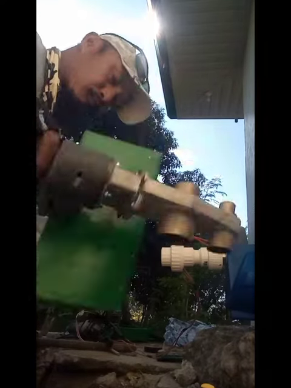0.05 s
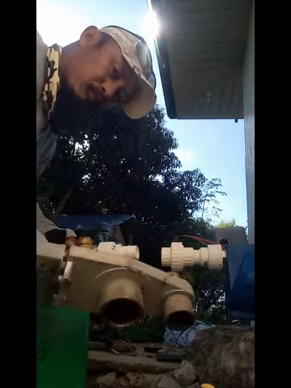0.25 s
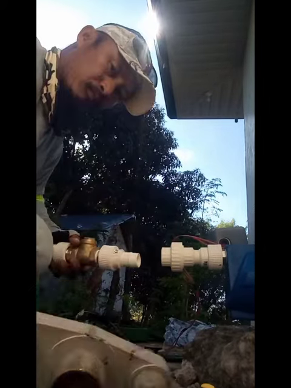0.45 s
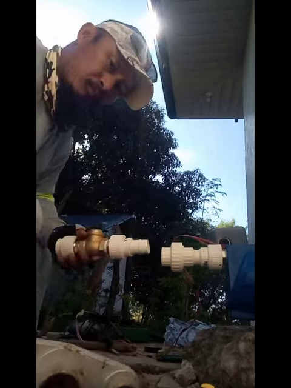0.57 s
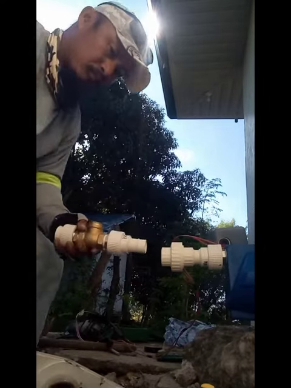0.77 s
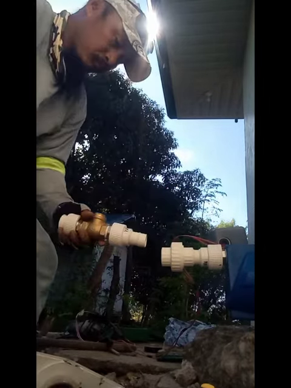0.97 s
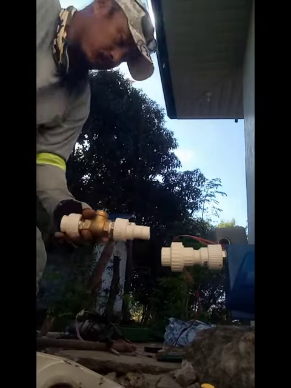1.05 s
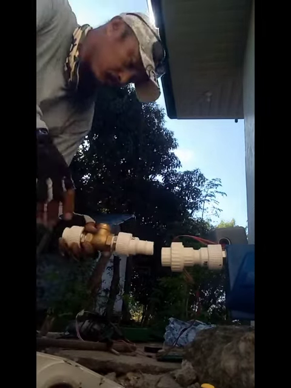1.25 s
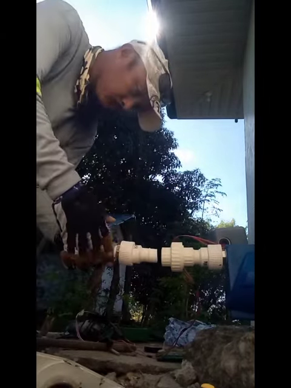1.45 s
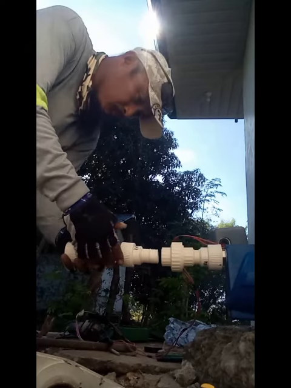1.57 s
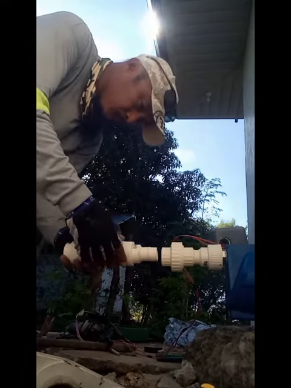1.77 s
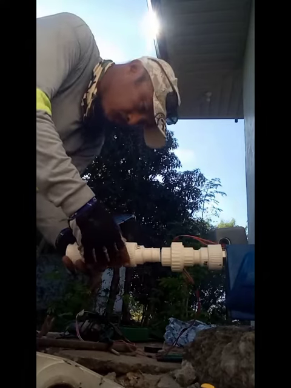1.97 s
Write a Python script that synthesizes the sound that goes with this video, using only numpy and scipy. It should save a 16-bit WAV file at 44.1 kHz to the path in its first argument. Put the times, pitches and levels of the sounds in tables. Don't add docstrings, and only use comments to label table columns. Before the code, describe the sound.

Hard gritty knocks of a hollow pipe fitting set down on stones, then quiet open yard

```python
import sys
import numpy as np
from scipy import signal
from scipy.io import wavfile

SR = 44100
rng = np.random.default_rng(int(sys.argv[2]) if len(sys.argv) > 2 else 0)


def put_to_file(sound):
    columns = np.atleast_2d(sound).T
    safe = np.clip(columns, -1, 1)
    whole_steps = np.round(safe * 32767)
    wavfile.write(sys.argv[1], SR, whole_steps.astype(np.int16))


def volts(x):
    e = np.asarray(x, float) / 20
    return 10 ** e


N = 88200


def clock():
    return np.arange(N) / SR


def rms_one(x):
    return x / np.sqrt(np.mean(x ** 2) + 1e-20)


def butter(x, order, hz, kind):
    return signal.sosfilt(signal.butter(order, hz, kind, fs=SR, output="sos"), x)


def drift(rate_hz):
    pole = np.exp(-80 * np.pi * rate_hz / SR)
    noise = rng.standard_normal(N // 40 + 2002)
    slow = signal.lfilter([1], [1, -2 * pole, pole * pole], noise)[2000:]
    return np.interp(np.arange(N) / 40, np.arange(len(slow)), rms_one(slow))


def ring(clicks, hz, t60_s):
    r = volts(-60 / (t60_s * SR))
    w = 2 * np.pi * hz / SR
    return signal.lfilter([0, np.sin(w)], [1, -2 * r * np.cos(w), r * r], clicks + 1e-18)


def banded(x, spectrum, patchy_db):
    edges = 25 * 2 ** np.arange(0, 9.6, 1 / 3)
    hz, db = np.transpose(spectrum)
    out = 0
    for k, (low, high) in enumerate(zip(edges, edges[1:])):
        band = butter(x[k % 2], 2, [low, high], "band")
        level_db = np.interp(np.log(low * high) / 2, np.log(hz), db, left=db[0] - 17)
        out = out + volts(level_db + patchy_db * drift(14.0)) * band
    return out


FOOTING_STARTS = [0, .4, .5, .55, .68]
# f/Hz, level/dB, t60/s
WALL_MODES = [
    [(1486, -3.5, 0.1), (1983, -4, 0.14), (2362, -3.5, 0.074), (2724, -9, 0.16), (2883, 3, .05),
     (3120, -5, 0.1), (3557, -5, 0.12), (3793, -5, 0.18), (4640, -5.5, .1), (5720, -12, 0.15),
     (6160, -10, 0.11), (6750, -10, 0.049)],
    [(1443, -7.5, 0.037), (1530, 1.5, 0.026), (1900, -12, .11), (2197, -4, 0.049), (2594, -3.5, .13),
     (3400, -19.5, 0.09), (3955, -3, .055), (4660, -8.5, 0.063), (5090, -11.5, .08), (6430, -8, 0.093),
     (7084, -14, .085)],
    [(1930, -6, .15), (2270, -13, 0.14), (3747, 4, 0.093), (4370, -1, 0.09), (5012, -7, 0.15),
     (6277, -6.5, .09), (7068, -4, .11)],
    [(1500, 3, 0.068), (2000, -11, 0.13), (2249, -0.5, .13), (2638, -3, 0.058), (3096, -9, 0.1),
     (3740, -10, 0.072), (4700, -15, 0.072), (6900, -6, .085)],
    [(1500, -4, 0.076), (2400, -9, 0.099), (2656, -2, 0.1), (2780, 4, 0.091), (3370, -3, .1),
     (4619, -16, .1)],
]
WALL_DB, SPREAD_DB_PER_OCT, FIRST_HIT_DB = -39.5, 8, 6.5
TWIN_DETUNE, TWIN_DB = 0.016, -4


def wall(t, runs, contacts, s, db, centre_hz):
    out = np.zeros(SR)
    first = (t >= 0) & (t < 1 / SR)
    footing = np.searchsorted(FOOTING_STARTS, s[:, 0]) - 1
    for k, modes in enumerate(WALL_MODES):
        here = footing == k
        for hz, mode_db, t60_s in modes:
            distance_oct = abs(np.log2(hz / centre_hz))
            reach = volts(db + mode_db + WALL_DB - SPREAD_DB_PER_OCT * distance_oct)[here]
            push = (reach * runs[here]).sum(0) * contacts
            hit = volts(FIRST_HIT_DB) * (reach * first[here]).sum(0)
            twin_hz = hz * (1 + TWIN_DETUNE * rng.uniform(0.32, 1) * rng.choice([-1, 1]))
            out += ring(push * rng.standard_normal(SR) + hit, hz, t60_s)
            out += volts(TWIN_DB) * ring(push * rng.standard_normal(SR), twin_hz, t60_s * 0.7)
    return out


# f/Hz, level/dB, t60/s
BODY_MODES = [(141.3, -5, 0.075), (284, 3, 0.021), (385, -3, 0.058), (450, -17.5, 0.023),
              (574.5, -1.5, 0.032), (686, -4, 0.041), (851, -6, 0.024), (1030, -3.5, 0.0088)]
BODY_DB = -36.5


def body(runs, contacts, thud_db):
    out = np.zeros(SR)
    for hz, mode_db, t60_s in BODY_MODES:
        push = (volts(thud_db + mode_db + BODY_DB) * runs).sum(0) * contacts
        out += ring(push * rng.standard_normal(SR), hz, t60_s)
    return out


def hollow_knocks(runs, contacts, db, centre_hz):
    level_db, decay_cycles = -24.5, 38
    out = np.zeros(SR)
    for run, hz in zip(volts(db) * runs, centre_hz[:, 0]):
        out += volts(level_db) * ring(run * contacts * rng.standard_normal(SR), hz, decay_cycles / hz)
    return out


# f/Hz, density/(dB per Hz)
GRIT_SPECTRUM = [(150, -21), (300, -6), (1400, -5), (2300, -1.5), (4700, -7.5), (7000, -18.5), (9500, -57),
                 (15800, -43)]
GRIT_DB, GRIT_FOLLOWS_THUD, BRIGHT_FROM_HZ = -1, 0.17, 5020


def grit(runs, contacts, db, thud_db, bright):
    crunch = np.zeros((2, N))
    push = volts(db + GRIT_FOLLOWS_THUD * (thud_db - db)) * runs
    sand = contacts * rng.standard_normal((2, SR))
    for kind, share in ("low", 1), ("high", bright):
        crunch[:, :SR] += butter((push * share).sum(0) * sand, 2, BRIGHT_FROM_HZ, kind)
    return volts(GRIT_DB) * banded(crunch, GRIT_SPECTRUM, patchy_db=4.5)


def sizzle(runs, contacts, db, bright):
    level_db, from_hz = -44, 11110
    hard = (volts(db) * bright * runs).sum(0) * (1 + contacts) * rng.standard_normal(SR)
    return volts(level_db) * butter(hard, 4, from_hz, "high")


# t/s, ring level/dB, length/s, best-excited f/Hz, thud level/dB
GROUND_CONTACTS = [(0.162, -27, 0.0048, 1600, -16), (0.166, -42.5, 0.035, 2870, -29),
                   (0.229, -36.5, 0.0053, 3000, -22.5), (.236, -12, 0.011, 3120, -11.5),
                   (.237, -11.5, 0.019, 4420, -53), (0.252, -11.5, 0.0046, 2480, -6),
                   (0.255, -18.5, 0.0085, 1504, -12), (0.26, -14, 0.0053, 3670, -30),
                   (0.252, -17.5, 0.024, 6140, -41), (0.325, -33, 0.029, 2435, -52.5),
                   (0.421, -14.5, 0.016, 2280, -8), (.430, -5, 0.0085, 1595, -9),
                   (0.428, -11.5, 0.016, 4450, -21), (0.44, -34.5, 0.024, 4840, -49.5),
                   (0.441, -14.5, 0.011, 2210, -18), (0.454, -34.5, 0.058, 2030, -37),
                   (0.501, -25, 0.014, 2250, -41), (0.505, -29.5, 0.024, 5060, -47),
                   (0.515, -29, 0.026, 2320, -29.5), (0.562, -27, 0.0052, 3300, -28),
                   (0.570, -21, 0.006, 1515, -15), (.571, -27, 0.0066, 4450, -51),
                   (0.582, -33.5, 0.022, 4700, -30), (0.597, -21.5, 0.018, 4160, -34),
                   (0.598, -15.5, 0.017, 2117, -35.5), (.607, -22.5, 0.0028, 1198, -21.5),
                   (0.617, -25.5, 0.016, 2120, -24), (0.697, -32, 0.0039, 1520, -20.5),
                   (0.71, -28.5, 0.012, 2600, -30), (0.723, -41, 0.019, 2750, -52)]
RISE_S, FALL_S, SETTLE_S, SETTLE_DB = 0.002, 0.0031, 0.022, -19.5
CONTACTS_PER_S, CONTACT_SCATTER_DB = 9000, 2.0
BRIGHT_HZ, BRIGHT_DB_PER_OCT = 2484, 9


def fitting():
    s, db, length_s, centre_hz, thud_db = np.array(GROUND_CONTACTS).T[:, :, None]
    t = clock()[:SR] - s
    after = np.clip(t - length_s, 0, 1)
    fall = np.exp(-after / FALL_S) + volts(SETTLE_DB) * np.exp(-after / SETTLE_S)
    runs = np.clip(t / RISE_S, 0, 1) * fall
    sizes = volts(CONTACT_SCATTER_DB * np.minimum(rng.exponential(1, SR), 4))
    contacts = rms_one(sizes * (rng.random(SR) < CONTACTS_PER_S / SR))
    bright = volts(BRIGHT_DB_PER_OCT * np.log2(centre_hz / BRIGHT_HZ))
    out = wall(t, runs, contacts, s, db, centre_hz)
    out += body(runs, contacts, thud_db)
    out += hollow_knocks(runs, contacts, db, centre_hz)
    out += sizzle(runs, contacts, db, bright)
    return np.pad(out, (0, N - SR)) + grit(runs, contacts, db, thud_db, bright)


# t/s, level/dB, f/Hz, t60/s
HARD_CONTACTS = [(.164, -25, 1280, 0.0056), (0.2339, -19, 189, 0.026), (0.2364, -4, 2970, 0.0086),
                 (0.254, -7, 2280, 0.0079), (0.2564, -6.5, 2300, 0.0083), (0.4259, -10.5, 180, 0.017),
                 (0.4354, -8, 1500, .008), (.444, -6.5, 2180, 0.004), (0.5708, -14, 230, 0.014),
                 (.571, -19.5, 1535, 0.029), (0.592, -20.5, 195, 0.025), (.606, -11, 2110, 0.0065),
                 (.6147, -14, 2360, 0.0061), (0.6999, -24.5, 450, 0.027), (0.7116, -22, 1700, 0.0071)]


def snaps():
    out = np.zeros(N)
    for s, db, hz, t60_s in HARD_CONTACTS:
        start = int(s * SR)
        out[start:start + 4000] -= volts(db) * ring(np.arange(4000) == 0, hz, t60_s)
    return out


# t/s, peak level/dB, f/Hz, t60/s
SMALL_TAPS = [(0.049, -44.5, 2436, 0.011), (0.505, -21, 2925, 0.073), (.632, -24, 720, 0.021),
              (0.715, -40.5, 3470, 0.046), (.821, -46.5, 2300, .01), (.853, -38, 2210, 0.0062),
              (.853, -56, 3980, .02), (0.97, -51, 642, 0.038), (.901, -45.5, 1100, 0.02),
              (.907, -54, 4400, .015), (.922, -43, 477, 0.033), (0.95, -44.5, 407, 0.059),
              (1.006, -55, 4040, .015), (1.085, -55.5, 450, 0.059), (1.163, -52, 740, .12),
              (1.188, -57.5, 563, 0.053), (1.72, -52.5, 180, 0.062), (1.836, -51.5, 305.6, 0.047)]
TAP_CONTACT_SHARE = 0.042


def taps():
    out = np.zeros(N)
    t = np.arange(6000) / SR
    for s, db, hz, t60_s in SMALL_TAPS:
        rough = 1 + 1.5 * rng.standard_normal(6000)
        contact = t * np.exp(-t / (TAP_CONTACT_SHARE * t60_s))
        tap = ring(rough * np.sin(2 * np.pi * hz * t) * contact, hz, t60_s)
        start = int(s * SR)
        out[start:start + 6000] += volts(db) * tap / abs(tap).max()
    return out


def echoes(x):
    level_db, t60_s = -22, 0.263
    t = np.arange(SR // 2) / SR
    tail = rng.standard_normal(len(t)) * volts(-60 * t / t60_s) * (t > 0.006)
    tail = signal.lfilter([0.4], [1, -0.6], tail)
    return volts(level_db) * signal.fftconvolve(x, tail / np.sqrt(np.sum(tail ** 2)))[:N]


# f/Hz, density/(dB per Hz)
RUSTLE_SPECTRUM = [(120, -49), (200, -26), (479, -5), (748, -1), (843, -11), (1540, -7), (1670, -15.5),
                   (2520, -9.5), (7000, -26), (9000, -43.5), (16000, -55)]
# t/s, level/dB
RUSTLE_LEVEL = [
    (0, -55),
    (0.153, -57),
    (0.298, -45),
    (0.702, -46.5),
    (.8, -57.5),
    (1.002, -55),
    (1.2, -62.5),
    (1.4, -72.5),
    (2, -69),
]


def rustle():
    noise = rms_one(banded(rng.standard_normal((2, N)), RUSTLE_SPECTRUM, patchy_db=1.5))
    return volts(np.interp(clock(), *np.transpose(RUSTLE_LEVEL))) * noise


# multiple of firing rate, level/dB
ENGINE_ORDERS = [(3, -21.5), (4, -12), (5, -5.5), (6, 1), (7, -5.5), (8, -10), (9, -9.5), (10, -15),
                 (11, -19)]
FIRING_HZ, ENGINE_DB, ENGINE_UNEVEN_DB, ENGINE_WOBBLE = 15.97, -51, 4.5, 0.002
ENGINE_PHASE_S, ENGINE_SMEAR = 0.015, 0.97


def engine():
    turn = 2 * np.pi * FIRING_HZ * (np.cumsum(1 + ENGINE_WOBBLE * drift(3.2)) / SR - ENGINE_PHASE_S)
    out = 0
    for k, db in ENGINE_ORDERS:
        level = volts(db + ENGINE_UNEVEN_DB * drift(5.8))
        smear = 2 * np.arctan(ENGINE_SMEAR * (k - 6))
        out = out + level * np.cos(k * turn - smear + 0.14 * drift(4))
    return volts(ENGINE_DB) * out


# t/s, f/Hz, level/dB
MOTOR_RUN = [
    (.89, 8500, -92),
    (0.949, 10270, -67),
    (0.991, 11280, -71),
    (1.025, 11250, -71),
    (1.055, 10650, -84),
    (1.094, 10600, -72),
    (1.141, 9600, -75),
    (1.21, 7160, -77),
    (1.28, 6600, -84.5),
]
# multiple of main line, level/dB
MOTOR_LINES = [(.6, -12), (.8, -6), (1.0, 0), (1.5, -9)]


def whine():
    s, hz, db = np.transpose(MOTOR_RUN)
    turn = 2 * np.pi * np.cumsum(np.interp(clock(), s, hz)) / SR
    level = volts(np.interp(clock(), s, db, left=-140, right=-140))
    return level * sum(volts(line_db + 5.4 * drift(8.6)) * np.sin(k * turn) for k, line_db in MOTOR_LINES)


def whistle(rows, rasp_db=0):
    rough_db, third_db = 1.5, -46
    s, hz, db = np.transpose(rows)
    t = clock()
    phase = 2 * np.pi * np.cumsum(np.interp(t, s, hz) * (1 + 0.0021 * drift(40))) / SR
    fade = np.clip((t - s[0]) / 0.016, 0, 1) * np.clip(1 + (s[-1] - t) / 0.021, 0, 1)
    level_db = np.interp(t, s, db) + 1.5 + rough_db * drift(33) + rasp_db * drift(103)
    return fade * volts(level_db) * (np.sin(phase) + volts(third_db) * np.sin(3 * phase))


# t/s, f/Hz, level/dB
FAR_CALL = [(1.44, 2276, -65.5), (1.486, 2298, -57.5), (1.5, 2334, -61), (1.516, 2354, -48.5),
            (1.546, 2342, -53.5), (1.578, 2305, -60), (1.594, 2364, -58), (1.68, 2313, -70)]
FAR_CALL_AGAIN = [(1.74, 2290, -76), (1.78, 2320, -65), (1.83, 2344, -64.5), (1.87, 2324, -75),
                  (1.90, 2350, -59), (2, 2380, -64.5)]
NEAR_CALL = [(1.82, 2770, -67), (1.846, 2504, -62), (1.882, 2607, -44.5), (1.896, 2592, -50.5),
             (1.922, 2588, -36.5), (1.938, 2636, -45), (1.974, 2615, -40.5), (2.0, 2590, -47)]
LATE_COO = [(1.6, 638, -87.5), (1.7, 634, -65.5), (1.9, 612, -70), (2, 588, -76)]
EARLY_TONE = [(.78, 606, -58.5), (.85, 640, -56), (.96, 600, -61), (1.1, 631, -65.5), (1.16, 615, -70)]
RISING_TONE = [(1.2, 692, -66), (1.26, 725.6, -59.5), (1.35, 766, -71.5), (1.44, 824, -70.5)]


def birds():
    calls = whistle(FAR_CALL, rasp_db=3.5) + whistle(FAR_CALL_AGAIN) + whistle(NEAR_CALL)
    low_tones = whistle(LATE_COO, rasp_db=2.0) + whistle(EARLY_TONE, rasp_db=5.0)
    return calls + low_tones + whistle(RISING_TONE, rasp_db=3.0)


# f/Hz, level/dB
MURMUR_BANDS = [(1342, -69.5), (1520, -77), (320, -74), (3490, -78.5)]


def murmur():
    out = 0
    for hz, db in MURMUR_BANDS:
        out = out + volts(db + 2.0 * drift(6.5)) * rms_one(ring(rng.standard_normal(N), hz, 0.023))
    return out


# f/Hz, density/(dB per Hz)
YARD_SPECTRUM = [(25, -28), (107, -1), (437, -38.5), (1320, -33.5), (2330, -22.5), (2520, -22.5),
                 (7000, -53.5), (15800, -65)]
YARD_DB = -58.5


def yard():
    return volts(YARD_DB) * rms_one(banded(rng.standard_normal((2, N)), YARD_SPECTRUM, patchy_db=2.5))


def scene():
    mic_low_hz = 70.5
    near = butter(fitting() + snaps() + taps(), 4, mic_low_hz, "high")
    far = engine() + whine() + birds() + murmur() + yard()
    return (near + echoes(near) + rustle() + far)[None]


def top_cut(x):
    return signal.sosfilt(signal.butter(12, 16310, fs=SR, output="sos"), x)


def record(dry):
    headroom, cutoff_hz = 0.95, 16600
    rounded = headroom * np.tanh(dry / headroom)
    mix = signal.sosfilt(signal.cheby2(12, 70, cutoff_hz, fs=SR, output="sos"), rounded)
    return top_cut(mix)


dry = scene()
out = record(dry)
put_to_file(out)
```